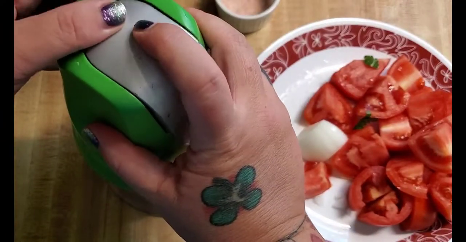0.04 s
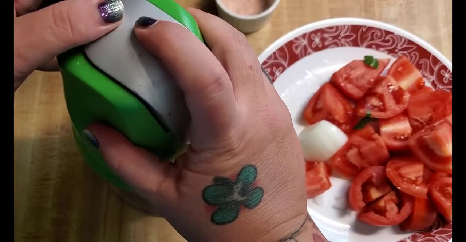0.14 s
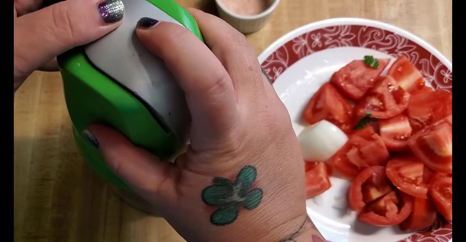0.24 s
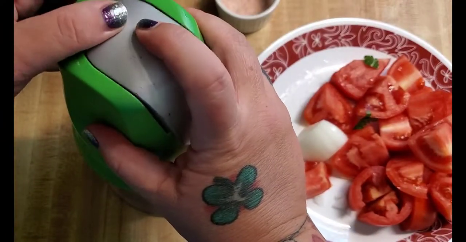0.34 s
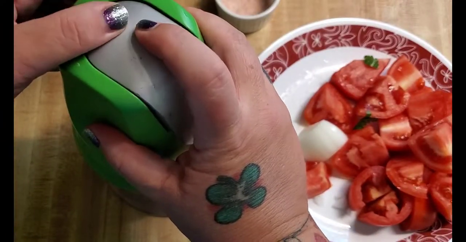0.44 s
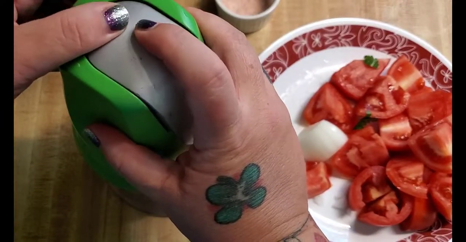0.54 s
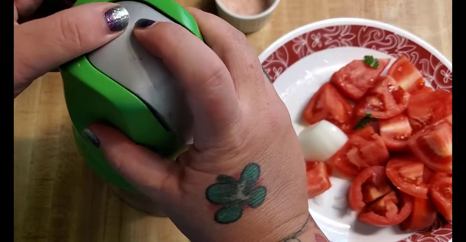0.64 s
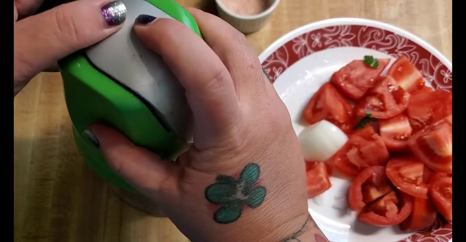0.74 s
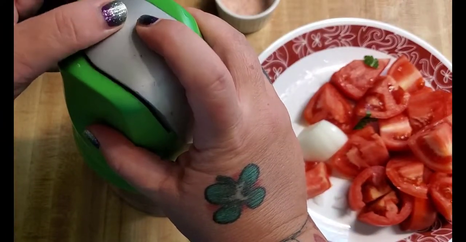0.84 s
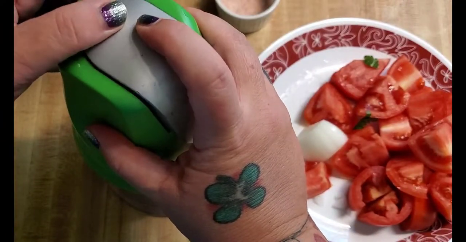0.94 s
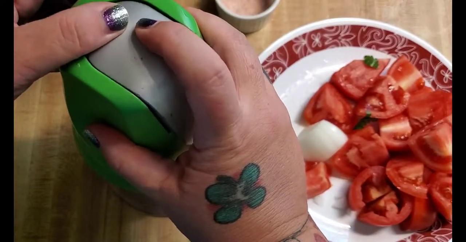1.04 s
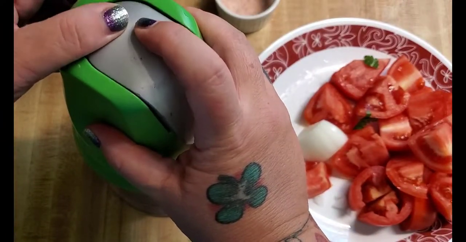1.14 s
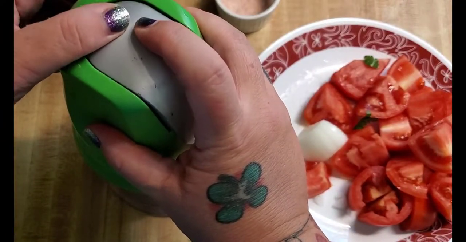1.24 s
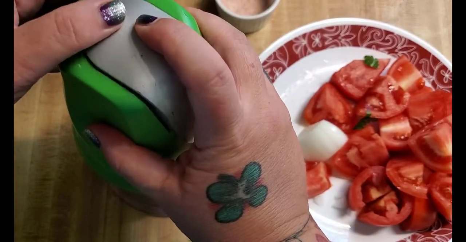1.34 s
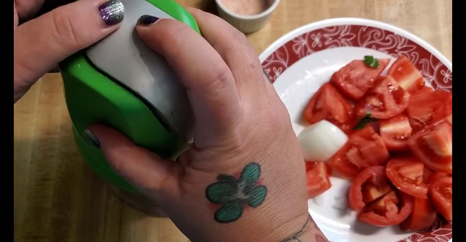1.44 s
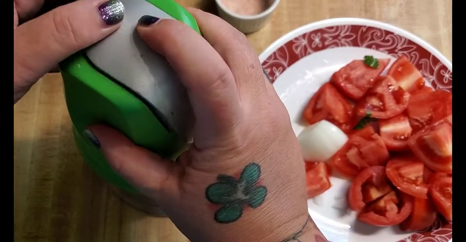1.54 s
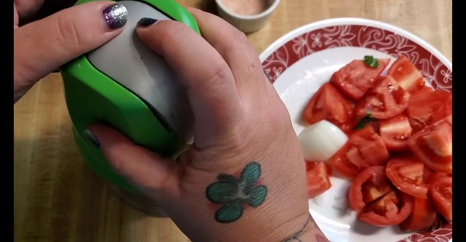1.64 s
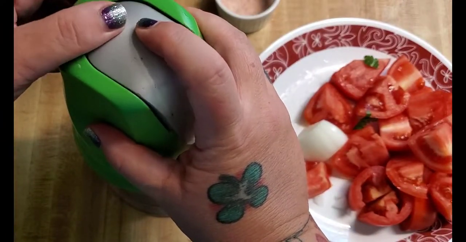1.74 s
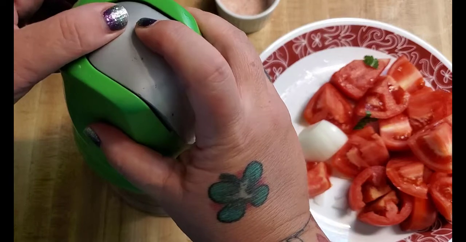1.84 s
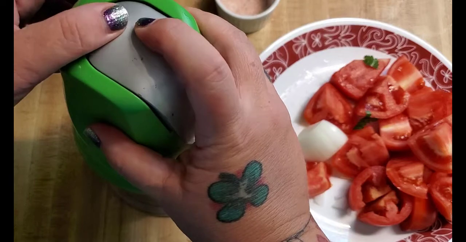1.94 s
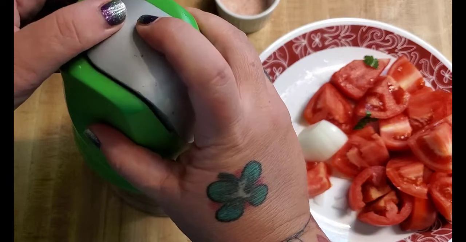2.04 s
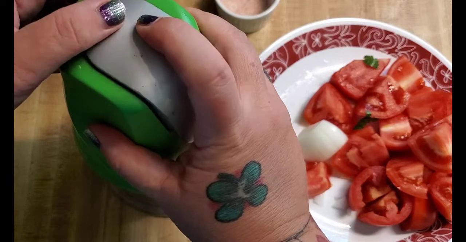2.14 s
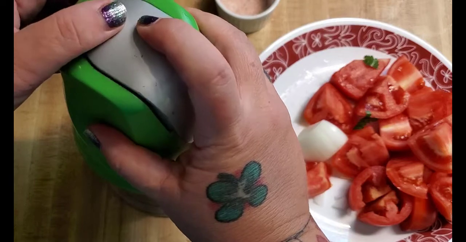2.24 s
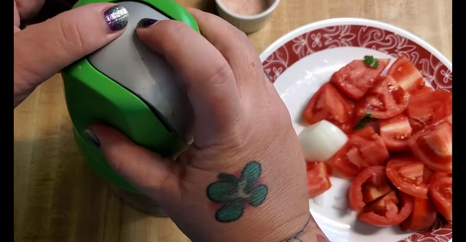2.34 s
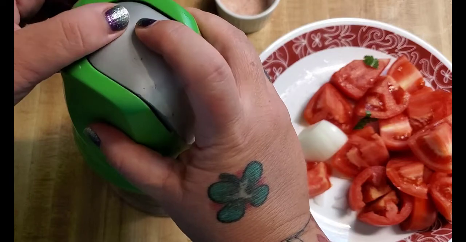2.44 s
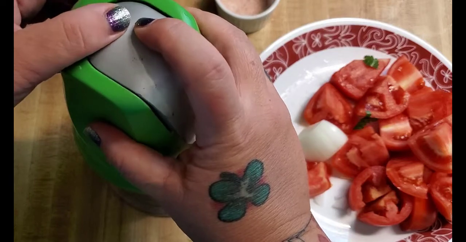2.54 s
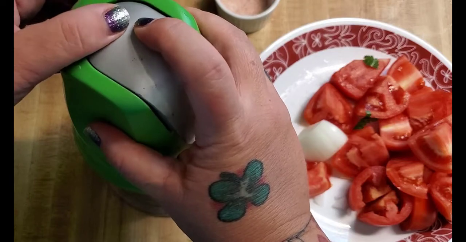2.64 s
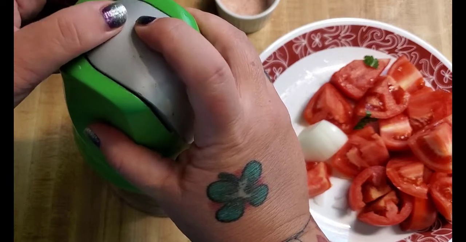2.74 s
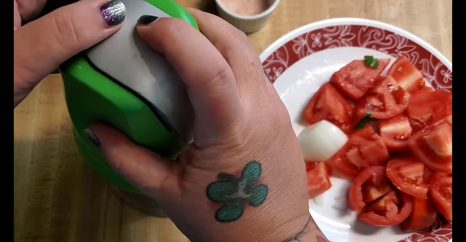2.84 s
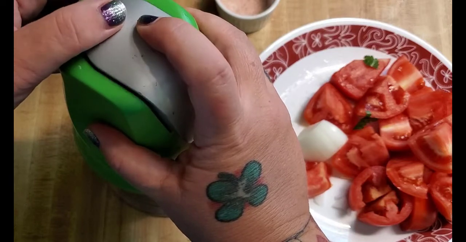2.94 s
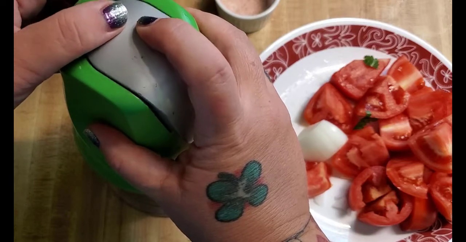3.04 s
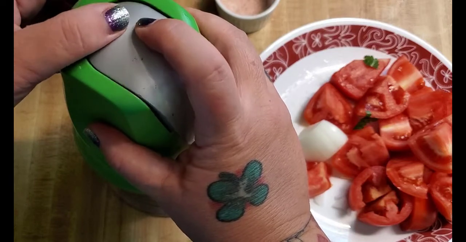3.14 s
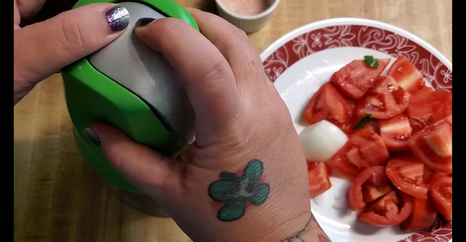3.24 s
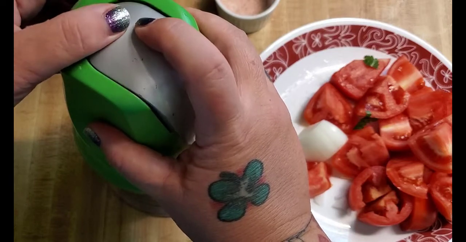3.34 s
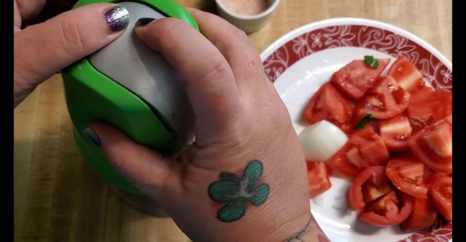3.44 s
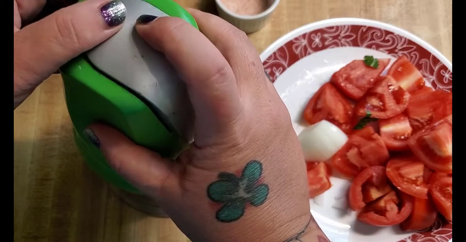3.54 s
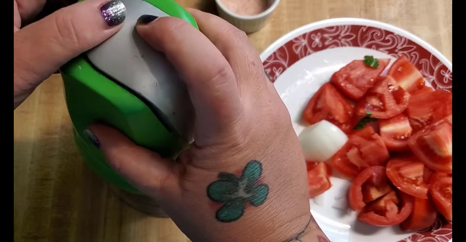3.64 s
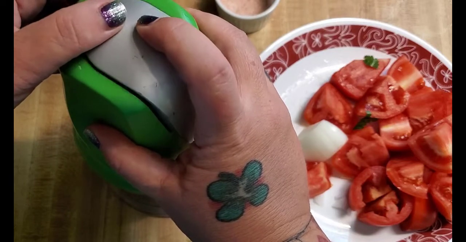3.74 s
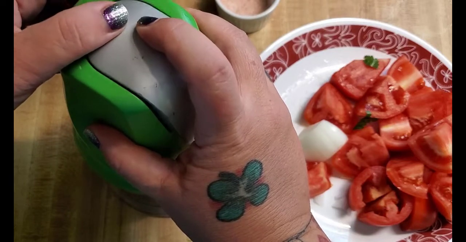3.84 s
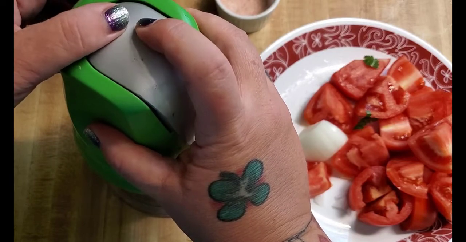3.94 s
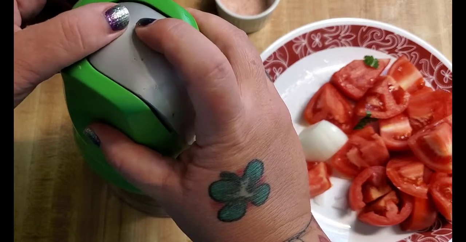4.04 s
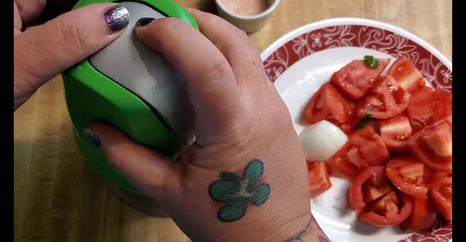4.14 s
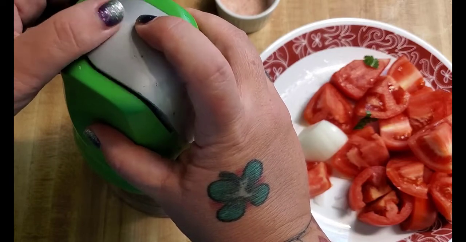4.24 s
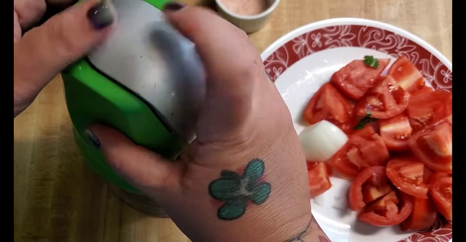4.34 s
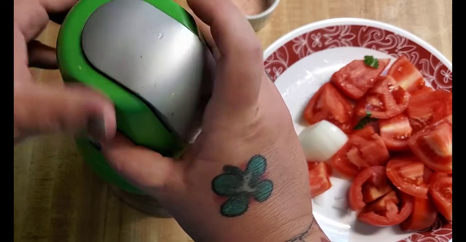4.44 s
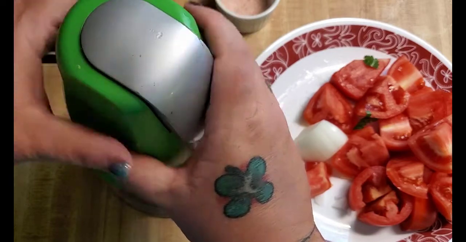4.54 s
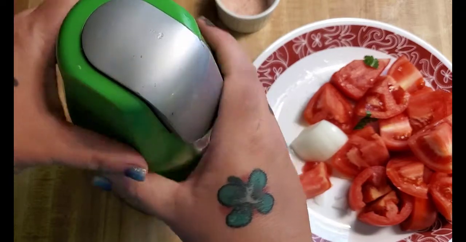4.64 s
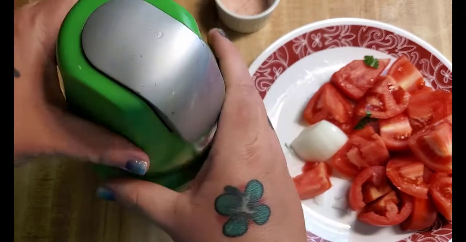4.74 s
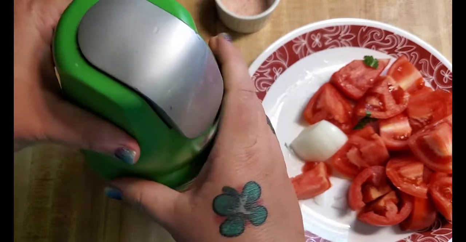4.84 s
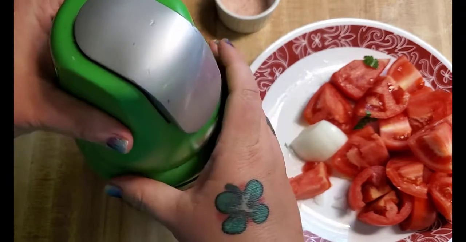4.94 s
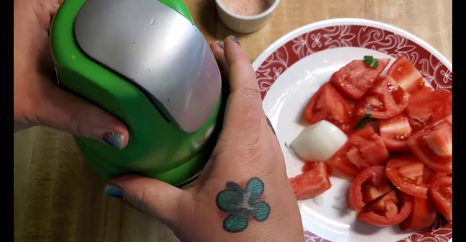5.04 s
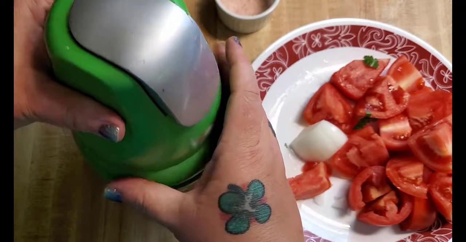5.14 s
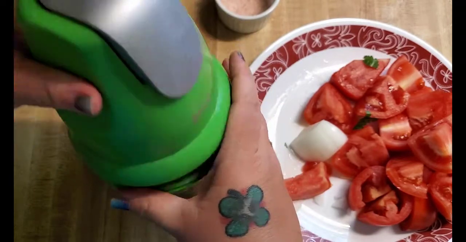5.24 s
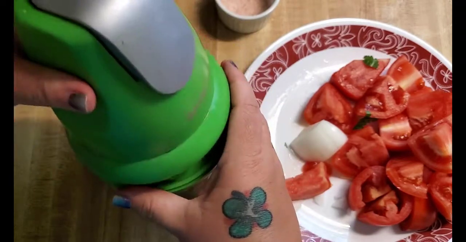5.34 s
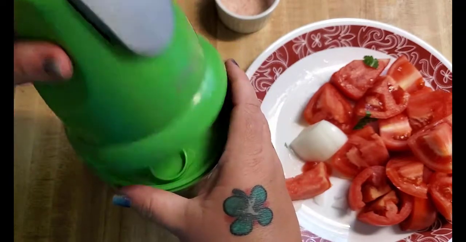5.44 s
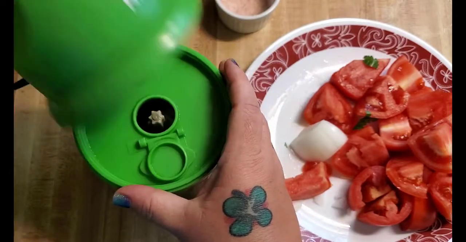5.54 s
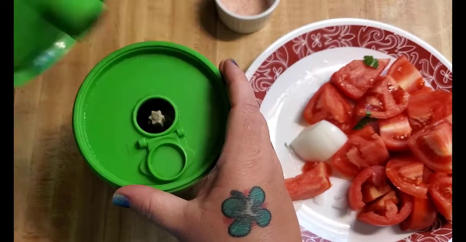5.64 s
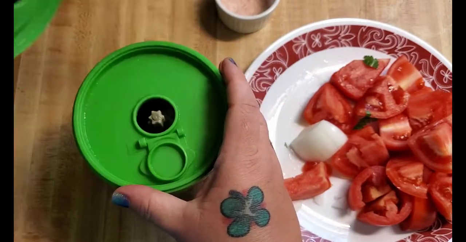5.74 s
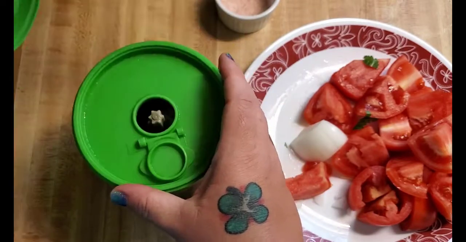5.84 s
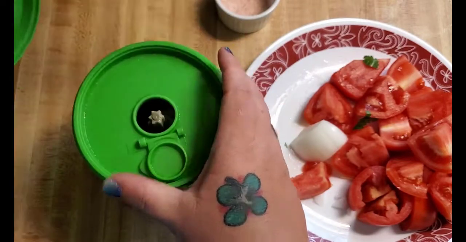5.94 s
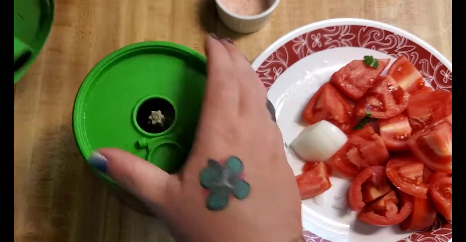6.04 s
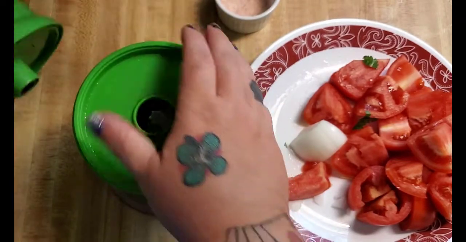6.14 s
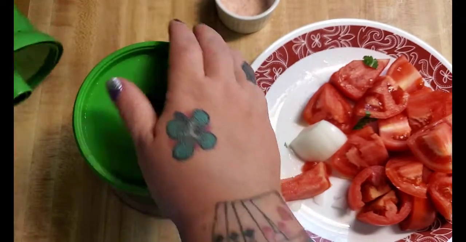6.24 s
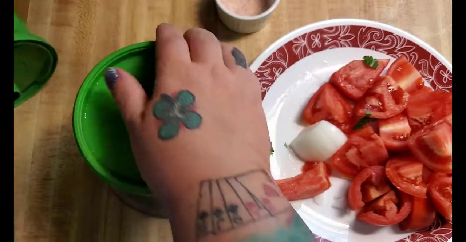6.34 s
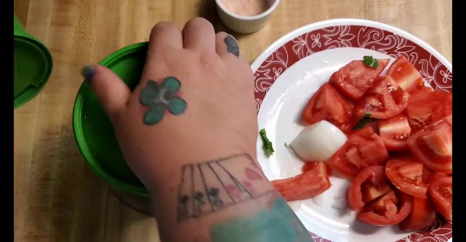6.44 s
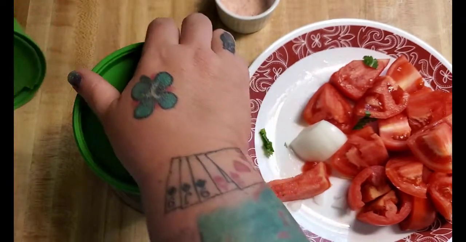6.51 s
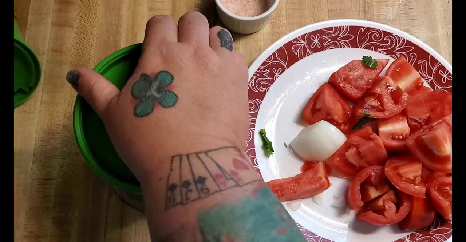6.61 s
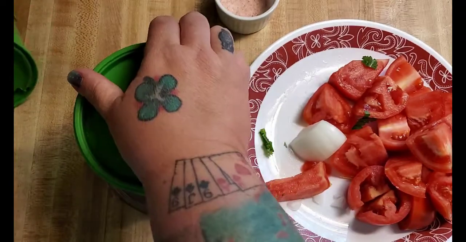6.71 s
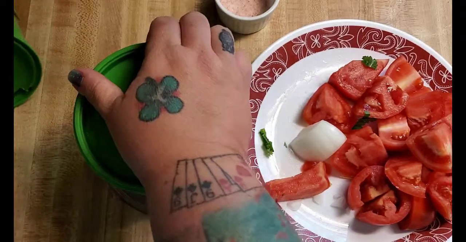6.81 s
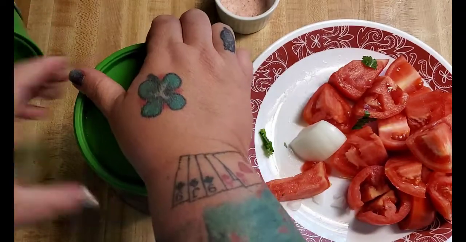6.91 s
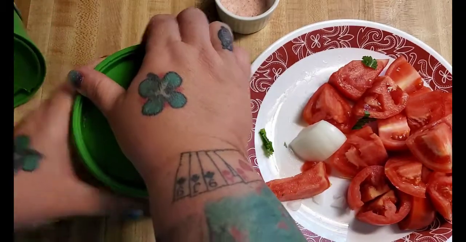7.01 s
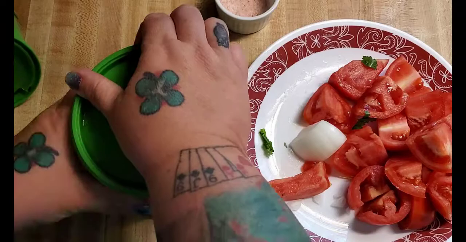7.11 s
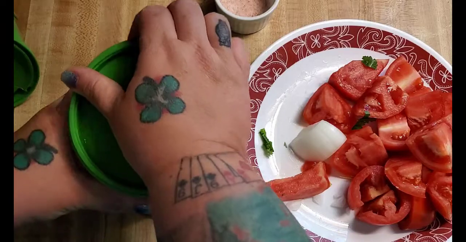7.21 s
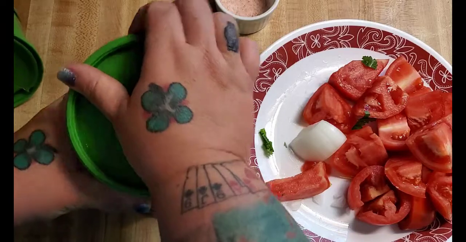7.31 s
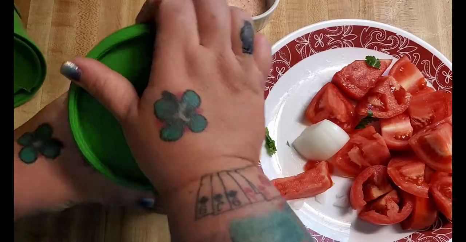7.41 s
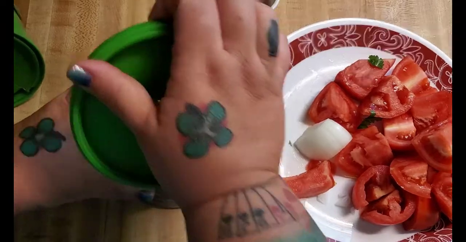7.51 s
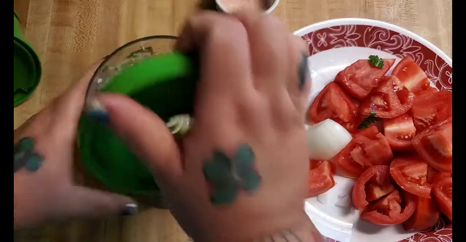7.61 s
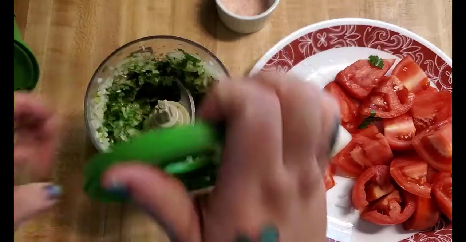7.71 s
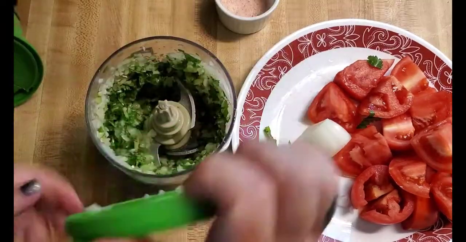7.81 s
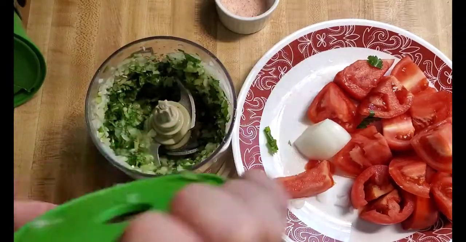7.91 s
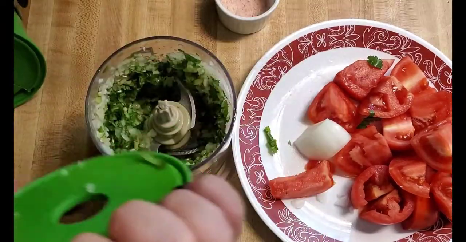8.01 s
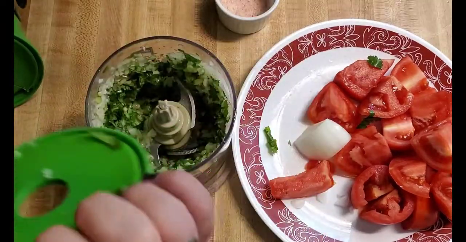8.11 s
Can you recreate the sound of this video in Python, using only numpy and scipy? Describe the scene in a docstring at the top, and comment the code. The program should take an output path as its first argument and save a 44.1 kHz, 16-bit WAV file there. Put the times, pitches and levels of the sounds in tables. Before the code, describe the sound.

A small electric food chopper runs very close on a wooden kitchen table, already buzzing at 0 s and quickly coasting down. Further bursts start near 0.4, 1.1, 1.7, 2.4, 3.2 and 4.0 s, each about a quarter second of power: a rough gear whine leaps up, vegetable pieces pelt the plastic bowl, the housing rattles harshly, then the pitch slides down fluttering to a stop. Tiny button snaps fall between bursts. From 4.5 s hands rub softly; at 5.2-5.4 s the motor comes off with dull thuds and a faint metallic ring, with light plastic ticks around 5.7 s. Low thumps at 6.3 s lead to the loudest hollow plastic knocks at 6.5-6.6 s. Handling rumbles, then the lid scrapes and clacks free at 7.2-7.6 s, leaving faint handling near 7.9 s. A quiet low hum, room air and faint high hiss remain, with short indoor reflections.

```python
"""A small electric food chopper, close by on a wooden kitchen table, is pulsed seven times.
Each press spins up a whining gear train, built from sines that follow the motor speed, then it coasts down.
Showers of tiny blows make the vegetables pelting the plastic bowl and the rattle of the housing.
The motor head is lifted off, the bowl knocks on the table and its lid is pulled free: ringing modes,
thuds and bursts of noise. Behind lie kitchen air, a steady hum and a faint high hiss."""
import sys
import numpy as np
from scipy import signal
from scipy.fft import rfft, irfft, next_fast_len
from scipy.io import wavfile
from scipy.ndimage import uniform_filter1d

SR = 44100
rng = np.random.default_rng(int(sys.argv[2]) if len(sys.argv) > 2 else 0)


def int16_out(signal):
    """Quantize to a 16-bit WAV file."""
    q = np.round(np.clip(np.atleast_2d(signal).T, -1, 1) * 32767)
    wavfile.write(sys.argv[1], SR, q.astype(np.int16))


N = 360120
TIME = np.arange(N) / SR

# Levels in the tables are relative: the functions that play them set the final balance.

# churning bowl spectrum: pitch_hz, density_db (per Hz)
CHURN_SPECTRUM = [(30, -52.5), (55, -1.5), (85, -8.5), (125, -1), (195, 4), (280, -2), (400, -1),
                  (560, 2.5), (800, -4), (1150, -2.5), (1700, -1), (2500, -8.5), (3500, -10.5), (5500, -14),
                  (10000, -44.5)]
# rattling housing spectrum: pitch_hz, density_db (per Hz)
RATTLE_SPECTRUM = [(300, -37), (1500, -3.5), (2600, -3), (3300, 2), (4300, -0.5), (5400, -1), (6600, -0.5),
                   (8200, 2.5), (9800, -3), (12000, -5.5), (14000, -10), (16000, -17.5)]
# housing resonances that the rattle excites: pitch_hz, level_db, t60_s
HOUSING_MODES = [(890, -11.5, 0.12), (1093, -11, 0.015), (1246, -13, .025), (1800, -15.5, 0.016),
                 (2690, -13.5, 0.06), (3080, -12.5, 0.024), (3660, -10, .018), (8180, -24.5, 0.0053)]


def chopper():
    """Bits of vegetable pelt the bowl, loose gear teeth rattle the housing, and the gears whine."""
    mesh_hz, churn, rattle = drive()
    whine, blade = gears(mesh_hz, (churn + rattle) / 2)
    # single passes of the blade stand out as it slows
    flutter = 1 + 2 * (1 - mesh_hz / mesh_hz.max()) ** 2
    pelting = shower(130 + mesh_hz / 4, spread_db=3.5, t60=.022)
    pelting = pelting * amp(1.1 * wander(45) + 1.9 * blade * flutter)
    chatter = shower(400 + mesh_hz / 2, spread_db=2.0, t60=.017)
    chatter = chatter * amp(1.06 * wander(70) + .67 * blade * flutter)
    churning = amp(-3.0) * churn * colour(pelting, CHURN_SPECTRUM)
    rattling = amp(3.0) * rattle * colour(chatter, RATTLE_SPECTRUM)
    housing = resonate(rattle * chatter, HOUSING_MODES)
    return churning + rattling + housing + whine


# presses of the button: on_s, off_s, target_mesh_hz, spin_up_s, coast_s, food_gather_s, churn_db, rattle_db
PRESSES = [(-.12, .082, 3106, 0.087, 0.15, .03, -21, -23.5),
           (0.429, 0.721, 3622, .14, 0.17, .025, -22, -25),
           (1.07, 1.313, 3960, .21, 0.19, .025, -22.5, -25), (1.712, 1.98, 3639, .16, .21, .03, -23.5, -24),
           (2.406, 2.719, 3848, .178, .243, .04, -23.5, -25),
           (3.178, 3.484, 3762, 0.12, 0.29, .04, -24.5, -26),
           (3.985, 4.152, 4293, .17, 0.29, .002, -23.5, -26.5)]
FULL_SPEED_HZ, CRAWL_HZ, RATTLE_POWER, RATTLE_RISE_S = 3390, 450, 1.48, .012
FLYING_HZ, CHURN_POWER = 1300, 1.286  # churning levels off once all the food is flying


def drive():
    """The motor spins up while switched on, then drag and friction stop it; loudness follows speed."""
    mesh_hz, churn, rattle = np.zeros((3, N))
    friction_hz = 600  # brings the coasting to a full stop
    for on, off, top_hz, rise, coast, gather, churn_db, rattle_db in PRESSES:
        since = np.maximum(TIME - on, 0)
        driven = top_hz * np.sqrt(1 - np.exp(-np.minimum(since, off - on) / rise))
        drag = np.exp(-np.maximum(TIME - off, 0) / coast)
        hz = np.maximum((driven + friction_hz) * drag - friction_hz, 0)
        mesh_hz += hz
        flying = (hz / np.hypot(hz, FLYING_HZ)) ** CHURN_POWER
        churn += amp(churn_db) * flying * (1 - np.exp(-since / gather))
        # the rattle grows as a power of speed and ceases at a crawl
        shaking = (hz / FULL_SPEED_HZ) ** RATTLE_POWER * np.tanh(hz / CRAWL_HZ) ** 2
        rattle += amp(rattle_db) * shaking * (1 - np.exp(-since / RATTLE_RISE_S))
    return mesh_hz, churn, rattle


# gear tones: mesh_multiple, level_db
GEAR_TONES = [(1, 0), (2, 1), (3, 0), (4, -12)]
# blade passing, motor shaft, its 7th and 13th orders: mesh_multiple, level_db
SHAFT_TONES = [(.0204, -13), (.0833, -8), (.5833, -9), (1.0833, -4)]
# how well the housing radiates a tone: pitch_hz, gain_db
RADIATION = [(60, -3), (300, -5), (700, -7), (1200, 1), (1800, -3), (2500, -1), (3300, 0), (4300, -7),
             (5500, -6), (6700, 0), (8300, -1), (10500, -9)]
WHINE_DB, OVERTONE_FADE_DB, COASTING_DB = -.5, -5, -2.5  # the last two act once the power is off


def gears(mesh_hz, level):
    """Teeth mesh in a rough whine; the uneven load on the blade sways its pitch."""
    jitter, rough, sway, flutter_db, ring_t60 = .008, .9, .8, 4, .045
    slack = 1 - mesh_hz / mesh_hz.max()  # slow gears flutter in their backlash
    uneven_hz = mesh_hz * (1 + jitter * (1 + 2 * slack) * wander(220))
    turns = np.cumsum(uneven_hz) / SR  # cycles of tooth meshing
    blade = np.sin(2 * np.pi * SHAFT_TONES[0][0] * turns + .54 * wander(5.1))
    slowing = 1. * (np.gradient(mesh_hz) < 0)
    coasting = uniform_filter1d(slowing, size=2000)  # unpowered teeth press less hard
    tones = np.zeros(N)
    for k, db in GEAR_TONES + SHAFT_TONES:
        # the teeth bounce in and out of contact
        contact = 1 + rough * wander(60 + 130 * min(k, 1))
        fade_db = OVERTONE_FADE_DB * slack * coasting * max(k - 1, 0)
        unsteady_db = flutter_db * np.sqrt(slack) * wander(27)
        gain = amp(db + read(RADIATION, k * mesh_hz) + fade_db + unsteady_db)
        tones += gain * contact * np.sin(2 * np.pi * k * turns + sway * min(k, 1) * blade)
    tones *= level * amp(WHINE_DB + COASTING_DB * coasting)
    tones *= np.minimum(mesh_hz / 800, 1)  # the tones die as the gears come to rest
    return .5 * tones + smear(tones, ring_t60), blade


# snaps of the button: start_s, level_db
SWITCH_SNAPS = [(.307, -44.5), (0.352, -28), (.399, -36), (.431, -37), (.996, -39.5), (1.044, -30.5),
                (1.076, -37.5), (1.632, -26), (1.684, -43), (1.712, -38), (2.372, -45), (2.407, -42.5),
                (3.134, -53.5), (3.181, -50.5)]
# snap spectrum: pitch_hz, level_db
SWITCH_COLOUR = [(200, -11.5), (1200, -4.5), (2300, 3.5), (4000, 4), (5400, 0.5), (6100, -4.5), (7000, 1.5),
                 (9000, -10.5), (16000, -25)]


def switch():
    """The button snaps as it is pressed and let go: short bursts of coloured noise."""
    t60 = .011
    out, t = np.zeros((2, N)), np.arange(SR // 8) / SR
    for s, db in SWITCH_SNAPS:
        snap = colour(rng.standard_normal((2, len(t))), SWITCH_COLOUR)
        add(out, s, amp(db + 3 - 60 * t / t60) * snap)
    return out


# knocks of the parts: start_s, thud_db, thud_hz, bowl_ring_db, crack_db, crack_centre_hz, left_minus_right_db
KNOCKS = [(3.985, -38.5, 190.1, -37, -28.5, 1603, -3.5), (4.965, -34.5, 148, -64, -55, 400, 4),
          (5.205, -11, 297, -55, -35.5, 350, 0), (5.247, -17.5, 324, -66, -49, 2000, 0),
          (5.375, -16.5, 256, -59, -33.5, 710, 1.5), (5.382, -21.5, 100, -45.5, -45, 400, 5),
          (5.509, -33.5, 73, -65, -53, 406, 6), (5.646, -66, 200, -53, -29, 4100, -1),
          (5.721, -68, 200, -54, -34, 3630, 1.5), (6.298, -15.5, 111.5, -41, -36, 3180, 0),
          (6.33, -13, 78, -38.5, -31.5, 2960, -1), (6.511, -7, 85.6, -23, -15.5, 2300, 3),
          (6.526, -19, 137, -20, -13.5, 1740, -1), (6.537, -16.5, 235, -34, -32, 1500, -10),
          (6.634, -12.5, 86, -18, -14, 1100, -1.5), (7.197, -39.5, 108, -42, -40.5, 2200, 1.5),
          (7.364, -50, 122, -38, -27.5, 1420, -1.5), (7.43, -40, 82.8, -45, -44, 3000, 2),
          (7.473, -50, 90, -43, -40, 1600, 1), (7.499, -40, 130, -67, -46, 1300, -2),
          (7.578, -42.5, 98.3, -45.5, -42.5, 745, -2.5), (7.965, -56.5, 199, -61, -61, 1440, 6)]
# plastic bowl modes: pitch_hz, level_db, t60_s
BOWL_MODES = [(231.4, -4.5, 0.25), (361, -6, 0.22), (407.3, 0.5, 0.13), (494.2, 1.5, 0.21),
              (572, 4.5, 0.054), (671, -11.5, 0.17), (807, -4.5, 0.079), (1068, -15, .11), (1290, -10, .08),
              (2010, -20.5, .15), (2260, -16.5, 0.15), (2390, -13, 0.1), (2660, -12.5, .11),
              (3240, -17.5, .09), (3670, -8, .05)]
# colour of a crack on the plastic: pitch_hz, level_db
PLASTIC_COLOUR = [(500, 4), (1300, 1.5), (2300, 1), (3600, 4), (5500, -2.5), (8500, -1.5), (15000, 0.5)]
TABLE_HZ, TABLE_DB, TABLE_T60_S = 62.9, -4, .51  # the table top booms under the lowest thuds
THUD_T60_S = .21  # for a thud at 100 Hz; lower ones last longer


def knocks(crack_t60=.032, slope_db=10, clatter_db=-13, clatter_t60=.27):
    """Each blow thuds through the table, rings the bowl, cracks at the contact and leaves a short clatter."""
    thuds, clacks = np.zeros((2, 2, N))
    t, hz = np.arange(SR // 2) / SR, np.geomspace(30, SR / 2, num=40)
    fading = amp(-60 * t / crack_t60) + amp(clatter_db - 60 * t / clatter_t60)
    boom = np.sin(2 * np.pi * TABLE_HZ * t) * amp(TABLE_DB - 60 * t / TABLE_T60_S)
    for s, thud_db, thud_hz, ring_db, crack_db, crack_hz, pan_db in KNOCKS:
        thud_t60 = THUD_T60_S * 100 / thud_hz
        wood = [(thud_hz / 4, -26), (thud_hz, 0), (thud_hz + 150, -10), (thud_hz + 450, -33), (8000, -85)]
        boards = colour(rng.standard_normal(len(t)), wood)
        thud = .51 * np.sin(2 * np.pi * thud_hz * t) + .31 * boards
        thud = thud * (1 - np.exp(-t / .0016)) * amp(-60 * t / thud_t60)
        add(thuds, s, amp(thud_db) * (thud + boom * (TABLE_HZ / thud_hz) ** 2))
        ring = np.zeros((2, len(t)))
        for f, db, t60 in BOWL_MODES:
            # each blow detunes the modes slightly and starts them at its own phase in each ear
            phase = 2 * np.pi * f * rng.normal(1, .016) * t + rng.normal(0, 1.0, (2, 1))
            ring += amp(db - 60 * t / t60) * np.sin(phase)
        hill_db = read(PLASTIC_COLOUR, hz) - slope_db * np.hypot(np.log2(hz / crack_hz), 1)
        crack = colour(rng.standard_normal((2, len(t))), np.column_stack([hz, hill_db]))
        crack = crack * amp(crack_db - 2.0) * fading
        pan = amp([[pan_db / 2], [-pan_db / 2]])
        add(clacks, s, (amp(ring_db - 1.5) * ring + crack) * pan)
    return thuds, clacks


# blows that ring the metal motor frame: start_s, level_db
FRAME_BLOWS = [(5.207, -51.5), (5.377, -48)]
# motor frame modes: pitch_hz, level_db, t60_s
FRAME_MODES = [(1395, -8, .65), (1850, -16, .4), (3180, -9, .32)]


def motor_frame():
    """Blows set the metal frame of the motor ringing in its own modes."""
    return ringing(FRAME_BLOWS, FRAME_MODES)


# clacks of the lid coming free: start_s, level_db
LID_BLOWS = [(7.197, -63), (7.364, -39), (7.474, -47), (7.578, -74)]
# lid modes: pitch_hz, level_db, t60_s
LID_MODES = [(777, 10.5, 0.043), (1110, 6.5, 0.13), (1280, -19, 0.087), (1575, 11, 0.039), (1830, 3, 0.051),
             (2130, 3.5, 0.093), (2620, 0, .06), (3780, -13, .04), (3950, -11, .15)]


def lid():
    """The lid clacks in its short plastic modes as it comes free."""
    return ringing(LID_BLOWS, LID_MODES)


# strokes of hands and of plastic on plastic: middle_s, length_s, rumble_db, hiss_db
STROKES = [(4.608, .3, -55.5, -62.5), (4.89, 0.18, -51.5, -67), (5.265, 0.11, -39.5, -57),
           (5.771, 0.2, -59, -58), (6.42, .12, -48, -64), (6.521, 0.071, -59, -48.5),
           (6.782, 0.33, -50.5, -76), (7.081, 0.14, -50.5, -58), (7.216, 0.15, -39.5, -64.5),
           (7.379, 0.12, -56, -52), (7.485, 0.28, -42, -53.5), (7.89, 0.49, -63, -70.5)]
# handling rumble spectrum: pitch_hz, density_db (per Hz)
RUMBLE_SPECTRUM = [(30, -16), (60, 11.5), (110, -2), (200, -8), (400, -16.5), (800, -26), (2000, -42)]
# sliding plastic spectrum: pitch_hz, density_db (per Hz)
SLIDE_SPECTRUM = [(300, -13), (1000, -0.5), (2300, -1), (5000, -4), (9000, -12), (12000, -10.5),
                  (15000, -40)]
STROKE_EDGE_DB, HOLDING_RUMBLE_DB = -12.5, -77  # fall from middle to ends; hands resting on the bowl
LID_SCRAPE_DB = -22  # how strongly sliding plastic sets the lid ringing


def handling():
    """Hands shift the bowl, and plastic slides in tiny slips that ring the lid; strokes swell and fade."""
    push, slide = amp(HOLDING_RUMBLE_DB) * (TIME > STROKES[0][0]), np.zeros(N)
    for s, length, rumble_db, hiss_db in STROKES:
        swell = amp(STROKE_EDGE_DB * (2 * (TIME - s) / length) ** 2)
        push = push + amp(rumble_db) * swell
        slide = slide + amp(hiss_db) * swell
    slips = slide * shower(450, spread_db=2.5, t60=.017) * amp(1.8 * wander(40))
    scrape = colour(slips, SLIDE_SPECTRUM) * slips.std()
    lid_scrape = amp(LID_SCRAPE_DB) * resonate(slips, LID_MODES)
    rumble = push * colour(rng.standard_normal(N), RUMBLE_SPECTRUM)
    return rumble + scrape + lid_scrape


# kitchen air spectrum: pitch_hz, level_db
AIR_SPECTRUM = [(18, -38.5), (30, 0.5), (64, -1.5), (319, -5), (364, -5), (554, -9), (666, -24), (740, -6),
                (1100, -36), (1670, -23), (2410, -36), (7470, -41), (10800, -28.5), (13000, -56),
                (16000, -65)]
# steady appliance hum: pitch_hz, level_db
HUM_TONES = [(60, -61), (120, -67.5), (186, -75), (367, -64.5), (738, -83)]


def background():
    """Still kitchen air, an appliance humming, and a faint narrow hiss high up."""
    hum = np.zeros(N)
    for hz, db in HUM_TONES:
        unsteady = 1 + .25 * wander(5)
        hum += amp(db - 2.0) * unsteady * np.sin(2 * np.pi * (hz * TIME + rng.random()))
    air = colour(rng.standard_normal((2, N)), AIR_SPECTRUM)
    hiss_band = [(9500, -48.5), (10600, -2.5), (11100, -1.5), (12200, -41)]
    hiss = colour(rng.standard_normal((2, N)), hiss_band)
    return amp(-59.5) * air + hum + amp(-83.5) * hiss


# decay of the kitchen: pitch_hz, t60_s
KITCHEN_DECAY = [(100, 0.12), (500, 0.31), (2000, 0.24), (6000, 0.19), (15000, 0.12)]


def kitchen(x, delay=.005):
    """Dense reflections, other ones for each ear, each band dying at its own speed."""
    hz, t, z = signal.stft(rng.standard_normal((2, SR // 2)), SR, nperseg=128)
    fading = amp(-60 * t / read(KITCHEN_DECAY, hz)[:, None])
    tail = signal.istft(z * fading, SR, nperseg=128)[1]
    tail = unit(tail) / np.sqrt(tail.shape[1])
    tail = np.pad(tail, ((0, 0), (int(delay * SR), 0)))
    return signal.fftconvolve(x, tail, axes=1)[:, :N]


def ringing(blows, modes):
    """A part rings with its own modes at each blow."""
    out, t = np.zeros((2, N)), np.arange(SR) / SR
    for s, blow_db in blows:
        for hz, db, t60 in modes:
            phase = 2 * np.pi * hz * t + rng.normal(0, .55, (2, 1))
            add(out, s, amp(blow_db + db - 60 * t / t60) * np.sin(phase))
    return out


def resonate(x, modes):
    """The modes of a part ring with whatever shakes it."""
    t = np.arange(SR // 8) / SR
    response = np.zeros(len(t))
    for hz, db, t60 in modes:
        response += amp(db) * unit(amp(-60 * t / t60) * np.sin(2 * np.pi * hz * t))
    return signal.oaconvolve(x, response[None] / np.sqrt(len(t)), axes=1)[:, :N]


def shower(per_s, spread_db, t60):
    """Tiny blows landing on three sides of a shell."""
    return unit(sum(smear(impacts(per_s, spread_db), t60) for side in ("left", "front", "right")))


def impacts(per_s, spread_db):
    """Random tiny blows, most small and a few large."""
    size = amp(spread_db * np.minimum(rng.exponential(1, N), 4))
    struck = rng.random(N) < per_s / SR
    return unit(size * rng.choice([-1, 1], N) * struck)


SHELL_MONO_HZ = 317  # well below this the shell sounds nearly the same towards both ears


def smear(x, t60):
    """The shell spreads a blow briefly without colouring it; above the bass it differs towards each ear."""
    t = np.arange(2 ** 12) / SR
    shell = rfft(rng.standard_normal((3, len(t))) * amp(-60 * t / t60))
    apart = (np.fft.rfftfreq(len(t), 1 / SR) / SHELL_MONO_HZ) ** 2
    flat = np.exp(1j * np.angle(shell[0] + apart * shell[1:]))  # keeps only the phase
    lead = 2 ** 7  # samples of spread ahead of the blow
    response = np.roll(irfft(flat), lead, axis=1)
    return signal.oaconvolve(x[None], response, axes=1)[:, lead:lead + N]


def wander(rate):
    """Smooth chance of rms 1; movement faster than the rate (Hz) is smoothed away."""
    size = 2 ** 15
    hz = np.fft.rfftfreq(size, TIME[-1] / size)
    slow = irfft(rfft(rng.standard_normal(size)) / (1 + (hz / rate) ** 4))
    return unit(np.interp(TIME, np.linspace(0, TIME[-1], size), slow))


def colour(x, points):
    """Gives a sound a spectrum, at rms 1."""
    size = next_fast_len(x.shape[-1], True)
    gain = amp(read(points, np.fft.rfftfreq(size, 1 / SR)))
    return unit(irfft(rfft(x, size) * gain, size)[..., :x.shape[-1]])


def read(points, hz):
    """Reads a curve at any frequency, straight between its points on a log scale."""
    f, value = np.transpose(points)
    return np.interp(np.log(hz + 1), np.log(f + 1), value)


def amp(db):
    """Decibels to amplitude."""
    return 10 ** (np.asarray(db) / 20)


def unit(x):
    """Scales a sound to rms 1."""
    return x / np.sqrt(np.mean(x ** 2) + 1e-20)


def add(mix, s, sound):
    """Lays a sound into the mix from second s, cut off at the end."""
    part = mix[:, max(round(s * SR), 0):][:, :sound.shape[-1]]
    part += sound[..., :part.shape[1]]


def scene():
    """The chopper, its parts and the hands, each sent into the kitchen, over the background."""
    thuds, clacks = knocks()
    motor = chopper()
    small = clacks + switch() + motor_frame() + lid() + handling()
    room = kitchen(amp(-8.5) * motor + amp(-7.5) * small + amp(-.5) * thuds)
    return motor + small + thuds + room + background()


# tilt between the two ports: pitch_hz, left_minus_right_db
PORT_BALANCE = [(200, 0.76), (500, 1.5), (1000, -1.8), (2000, 2), (4500, 1.5), (8000, 3.5), (13000, -0.1)]
EDGE_HZ = 16100  # upper band limit


def record(dry, apart_hz=480):
    """Two close microphone ports share the bass and differ in the treble; then the band limit."""
    hz = np.fft.rfftfreq(N, 1 / SR)
    left, right = rfft(dry) * hz ** 4 / (hz ** 4 + 36 ** 4)  # the deepest rumble is cut
    apart = hz ** 2 / (hz ** 2 + apart_hz ** 2)
    mid = (left + right) / 2
    side = (left - right) / 2 * np.sqrt(apart) * np.minimum(hz / 300, 1)
    tilt_db = read(PORT_BALANCE, hz) / 2
    ports = irfft(np.array([(mid + side) * amp(tilt_db), (mid - side) * amp(-tilt_db)]), N)
    lowpass = signal.firwin(511, EDGE_HZ, window=("kaiser", 9), fs=SR)
    return signal.oaconvolve(ports, lowpass[None], "same")


dry = scene()
out = record(dry)
int16_out(out)
```